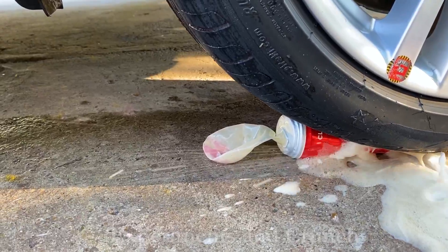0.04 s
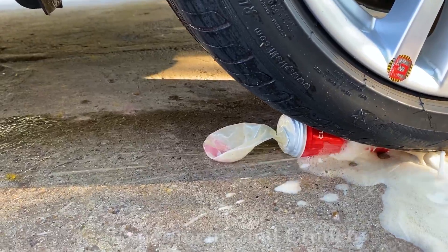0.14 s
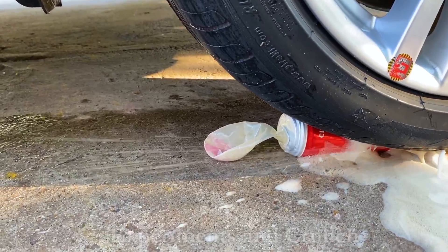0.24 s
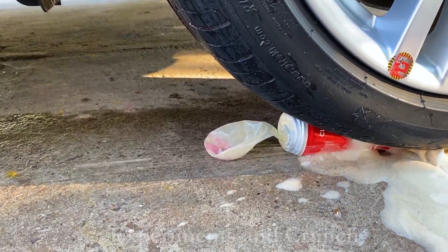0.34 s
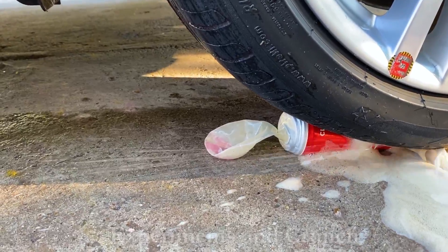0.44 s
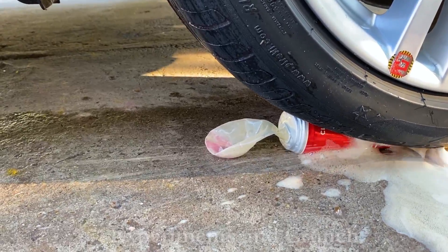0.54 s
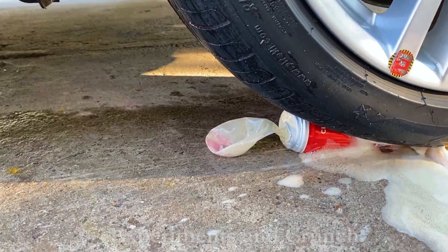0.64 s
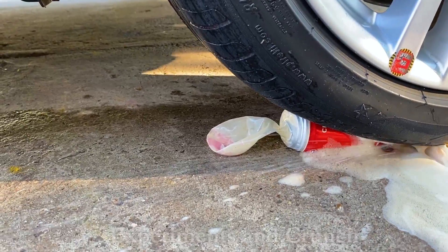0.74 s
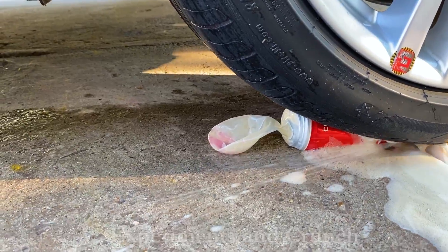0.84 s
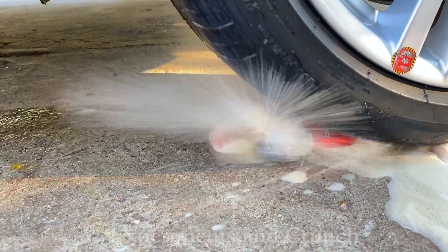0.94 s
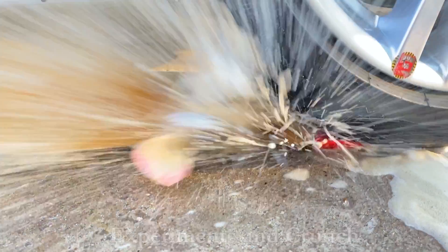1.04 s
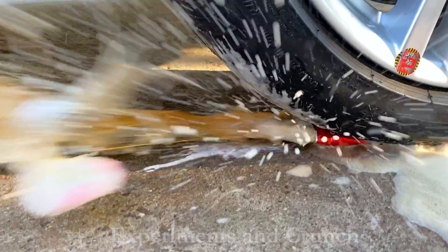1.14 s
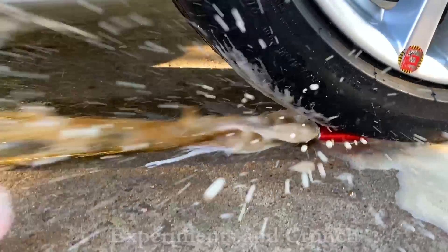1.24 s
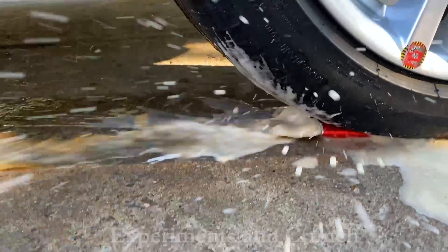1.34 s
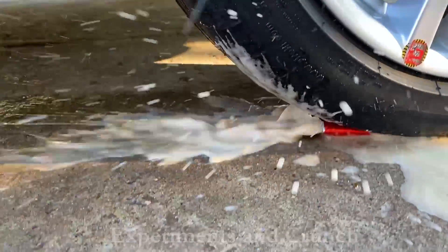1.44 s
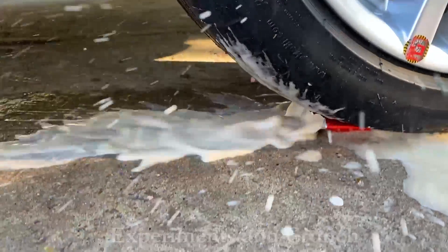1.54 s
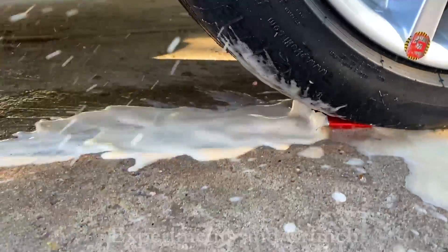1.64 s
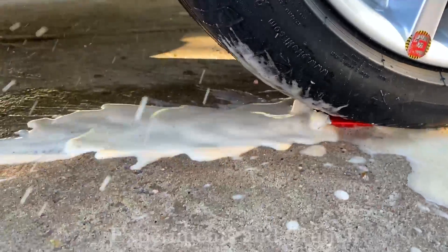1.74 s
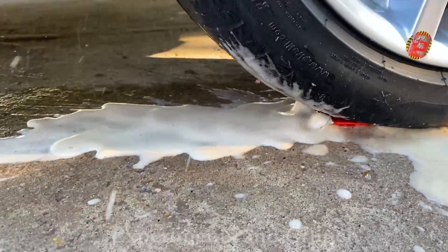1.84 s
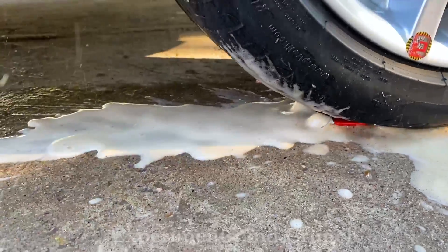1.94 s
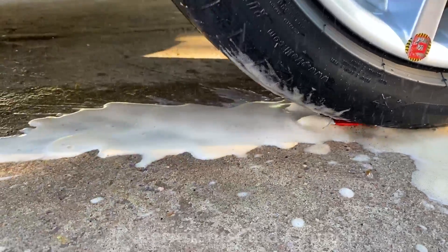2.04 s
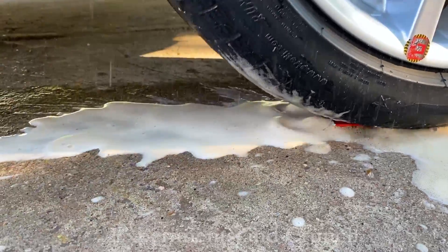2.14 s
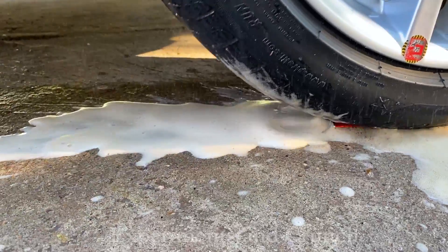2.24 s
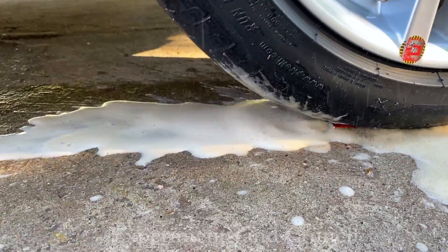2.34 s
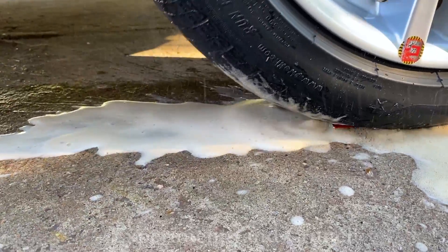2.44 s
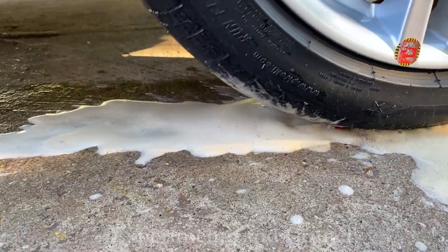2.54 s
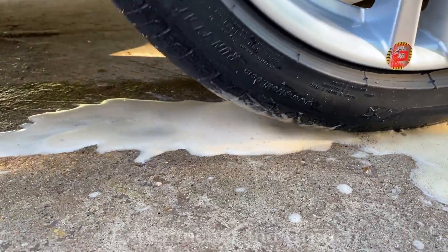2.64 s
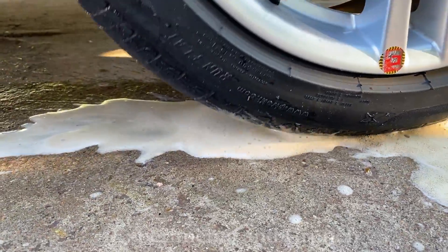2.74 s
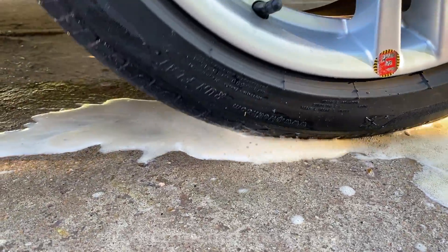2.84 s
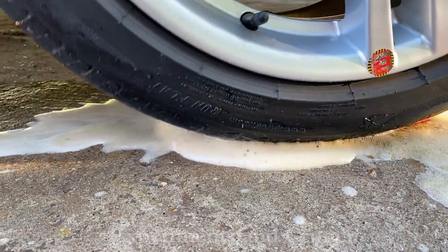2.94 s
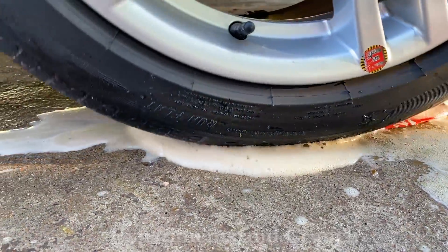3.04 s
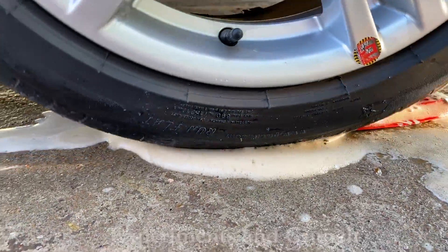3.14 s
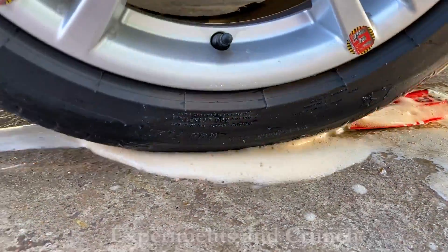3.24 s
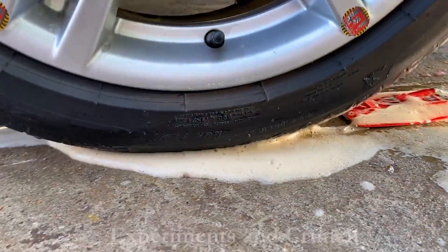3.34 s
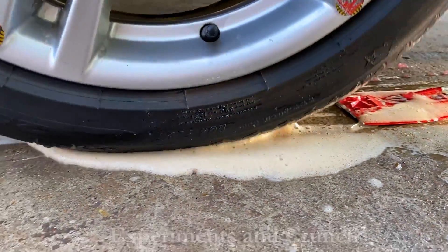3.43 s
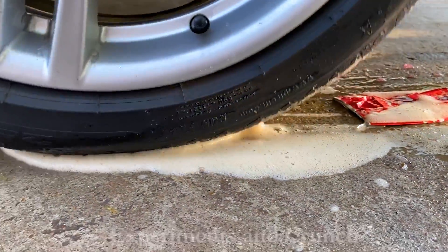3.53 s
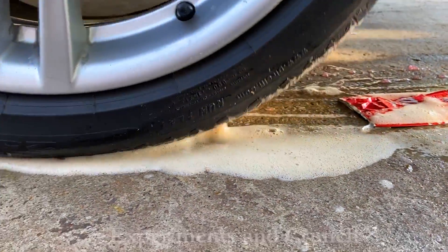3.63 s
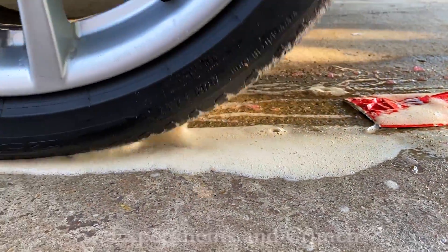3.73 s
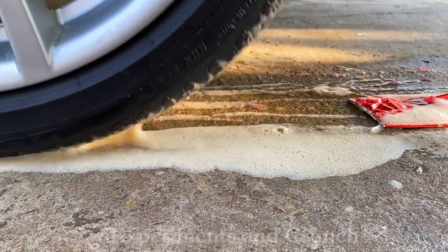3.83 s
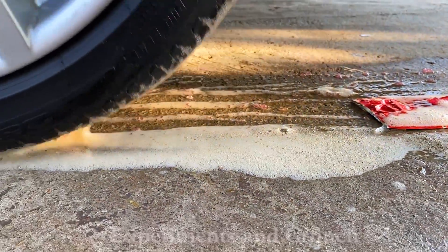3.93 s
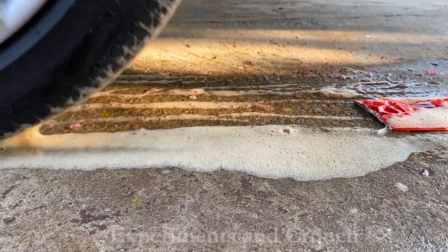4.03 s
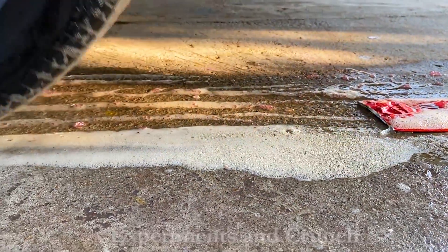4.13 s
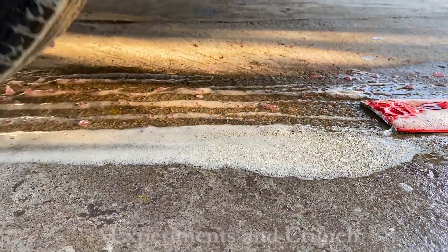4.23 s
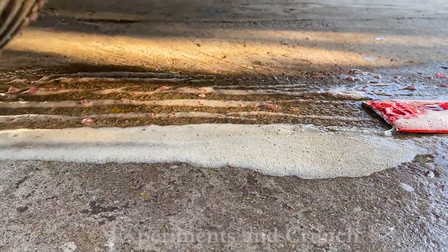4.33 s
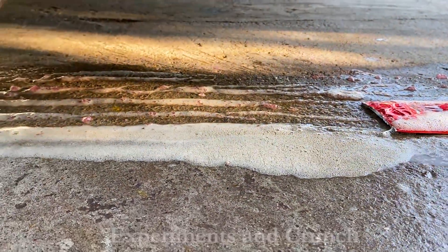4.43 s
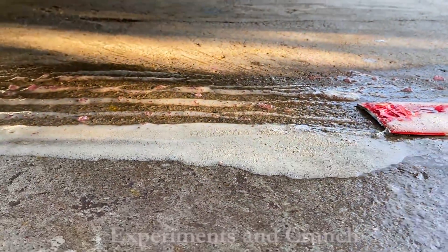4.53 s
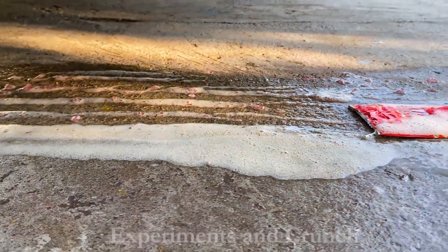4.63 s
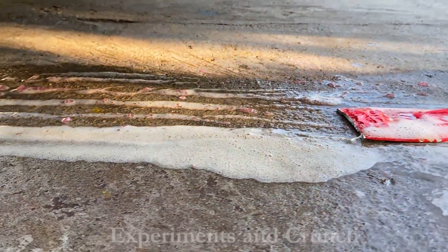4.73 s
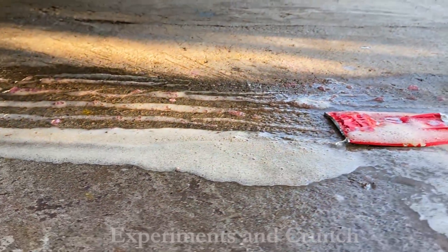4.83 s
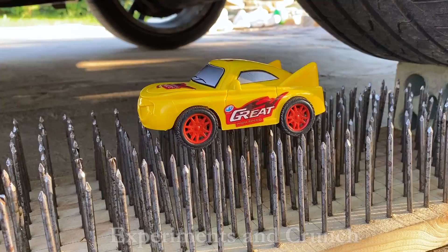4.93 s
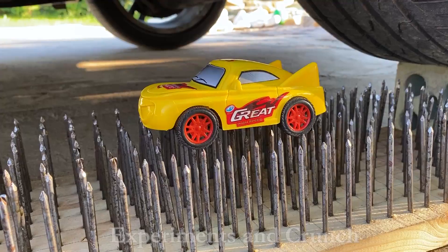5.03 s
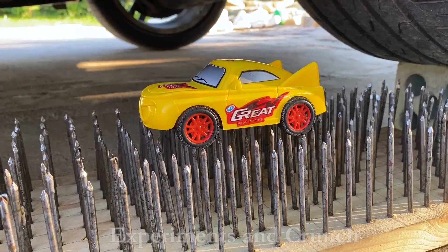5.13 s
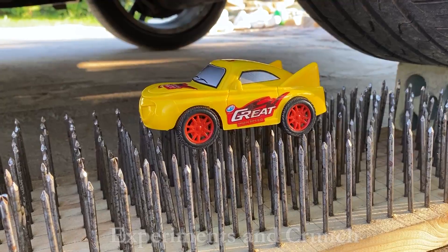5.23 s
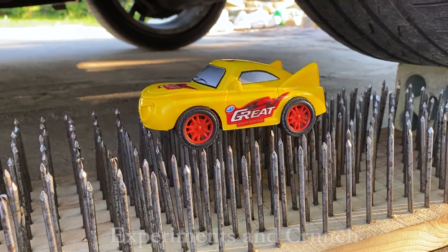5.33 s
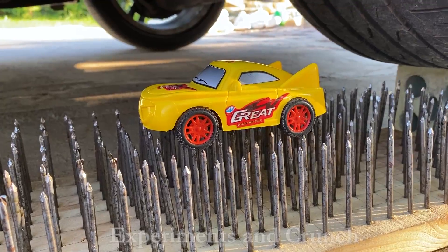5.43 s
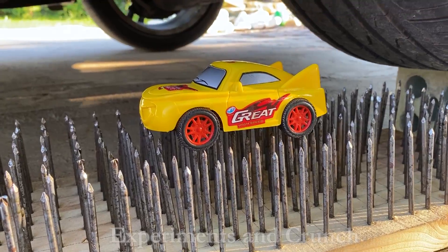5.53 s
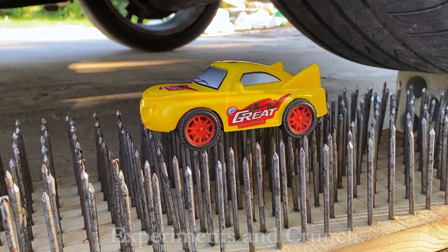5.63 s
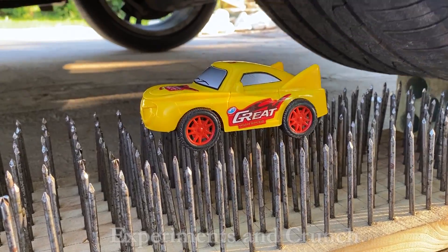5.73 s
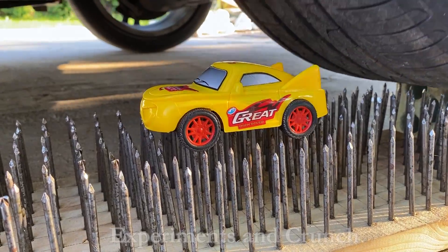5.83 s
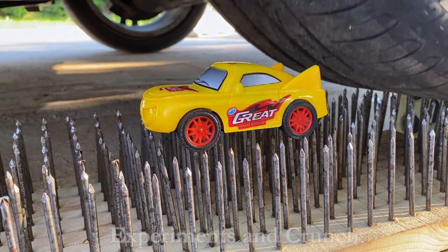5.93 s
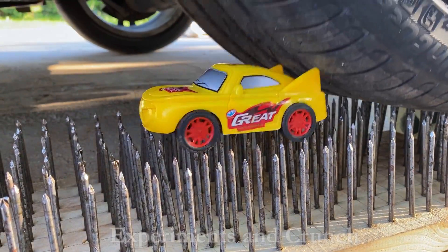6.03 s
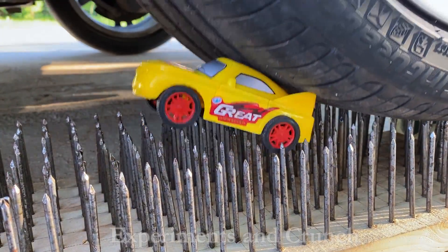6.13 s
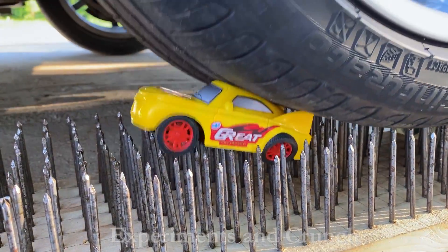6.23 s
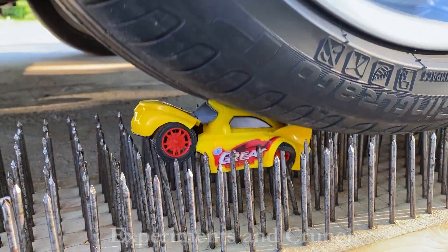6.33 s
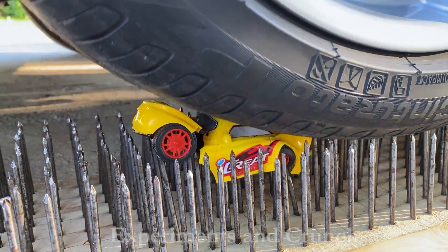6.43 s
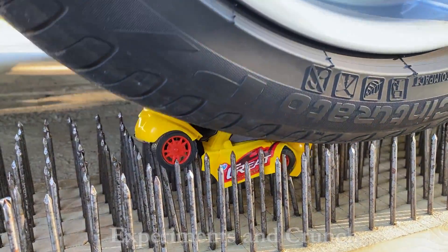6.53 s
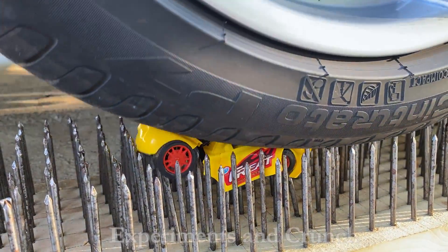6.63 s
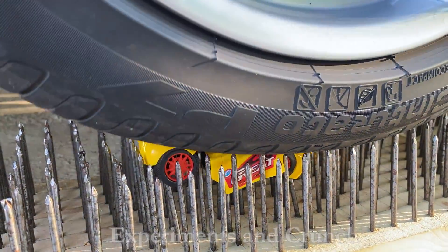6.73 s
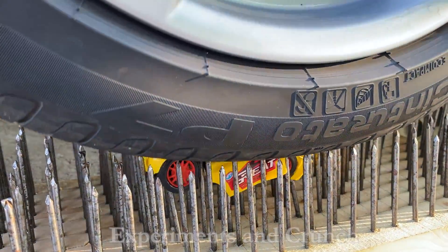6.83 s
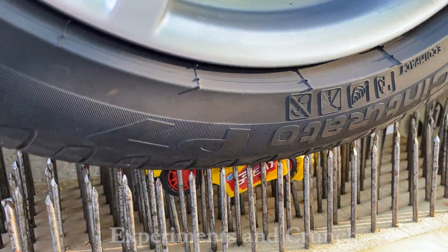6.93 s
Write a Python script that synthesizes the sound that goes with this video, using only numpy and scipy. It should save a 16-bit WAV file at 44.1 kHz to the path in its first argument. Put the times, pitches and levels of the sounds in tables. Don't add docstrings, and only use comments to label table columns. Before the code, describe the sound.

Close, dry outdoor sound beside a car tyre. From 0 to 1 s a slowed engine buzzes low and steady beneath a muffled, constant gas hiss. At about 1.0 s the can wall flutters and rasps, then bursts at 1.05 s in a loud, downward-falling thump with a short rumbling tail. The background drops sharply, then slowly returns as a dull drone, with wet foam splats around 1.85-1.95 s and heavier thuds to 2.5 s. At 2.6 s it cuts to normal speed: quiet idle, fan hum, gritty clicks and fizzing foam pops until 3.7 s, then engine alone, swelling slightly. At 5 s a louder idle with faint whine begins; a soft body jolt at 5.3 s. Plastic caves in from 6.1 to 6.35 s in dense crunches, loudest near 6.18 s, followed by scattered bright cracks. At 6.85 s remains drop with a hollow knock and brief metallic ring.

```python
import sys
import numpy as np
from scipy import signal
from scipy.fft import rfft, irfft, next_fast_len
from scipy.io import wavfile
from scipy.ndimage import uniform_filter1d, map_coordinates

SR = 44100
rng = np.random.default_rng(int(sys.argv[2]) if len(sys.argv) > 2 else 0)


def gain_from_db(level_db):
    decades = np.asarray(level_db, float) / 20
    return 10 ** decades


def generate_wav(signal):
    frames = np.transpose(np.atleast_2d(signal))
    scaled = np.clip(frames, -1, 1) * 32767
    pcm = np.round(scaled).astype(np.int16)
    wavfile.write(sys.argv[1], SR, pcm)


N = 307377

SLOW_SPEED, SLOW_END_S, TOY_START_S = 0.3, 2.596, 4.995
FAN_HZ, FAN_NEAR_HZ, FAN_NEAR_S, WHINE_HZ = 216.4, 220.5, 5.6, 992.7

# [firing_multiple, level_db]
ORDERS_SLOW = [(2, -18), (3, -16), (4, 15), (5, -3.5), (6, -16), (10, 2), (12, 4.5)]
ORDERS_ROLL = [(1, -27), (2, -8), (3, 2), (4, -1), (5, -3), (6, -9), (7, -16), (9, -13.5), (10, -20),
               (12, -12)]
ORDERS_TOY = [(1, -49.5), (2, 1), (3, 2.5), (4, 6.5), (5, 1), (6, -24), (9, -10), (10, 2), (12, -6)]
# [freq_hz, level_db_per_hz]
SPRAY = [(24, -31.5), (40, 0.5), (197, -14.5), (287, -6), (611, -9), (1250, -18.5), (1850, -20.5),
         (2240, -15.5), (2490, -20.5), (2880, -7), (3630, -21), (4290, -18.5), (4760, -30.5), (5520, -16.5),
         (6000, -45), (7800, -52), (13200, -120)]
FOAM = [(190, -43), (330, -9), (718, -5), (1780, -18), (2090, -13.5), (2500, -18.5), (3080, -13.5),
        (5510, -22), (6000, -37.5), (7800, -65), (13200, -120)]
BAY_ROLL = [(60, 8.5), (170, -5), (224, 6), (270, -8), (540, -7), (900, -16), (2050, -10.5), (2850, -14),
            (3050, -20.5), (6800, -26.5), (8400, -30.5), (10300, -24), (13200, -38), (15000, -29.5)]
BAY_TOY = [(70, -3), (147, -5.5), (239, -1), (322, -13), (836, -20.5), (1280, -24), (2220, -20),
           (2850, -24.5), (3050, -29.5), (6840, -34), (8300, -41), (10500, -35.5), (13200, -53),
           (15000, -44)]
# [freq_hz, width_hz, level_db]
SPRAY_RINGS = [(387, 17, 2), (660, 120, 6), (2290, 280, 4.5), (2845, 190, -1.5)]
INJECTOR_RING = [(6900, 270, 3.5)]
BAY_RINGS = [(543, 91, 3), (1371.3, 21, 11.5), (1800, 41.5, 6), (2135, 96, 6), (2250, 160, 5.5)]
FAN_RING = [(221.7, 12.5, 6)]
# [time_s, gain_db]
GAIN_SLOW = [
    (0, 0),
    (0.98, 0.21),
    (1, 0.5),
    (1.178, -24.5),
    (1.39, -32.5),
    (1.538, -29),
    (1.61, -28.5),
    (2.1, -16.5),
    (SLOW_END_S, -17.5),
]
GAIN_TOY = [
    (TOY_START_S, -1),
    (5.06, 0),
    (6.17, -1),
    (6.38, -4),
    (6.463, -18),
    (6.61, -9),
    (6.77, -4),
    (6.86, -5),
    (6.97, -11),
]
# [time_s, share_of_way]
TRAVEL = [
    (SLOW_END_S, 0),
    (TOY_START_S, 1),
]
# [time_s, level_db]
LURCH = [
    (5.19, -61),
    (5.24, -30.5),
    (5.31, -29),
    (5.35, -38),
    (5.4, -56),
]
# [freq_hz, width_hz, level_db]
BODY_MODES = [(65, 18, 10), (95, 15, 4), (143, 18, -17), (217, 11, -27), (482, 130, -12)]
# [time_s, pops_per_s, level_db]
TREAD = [
    (2.62, 120, -33),
    (3.0, 150, -33),
    (3.45, 120, -34),
    (3.7, 40, -37),
]
# [time_s, peak_db, centre_hz, bright_edge_db_re_peak]
GRIT = [(2.6436, -34.5, 2720, -3), (2.6657, -28, 1650, 5), (2.7332, -36, 2360, 8.5),
        (2.8208, -56, 1910, -13.5), (2.8833, -35.5, 4520, -10), (2.9007, -32, 3950, -26),
        (2.914, -50, 3980, -10), (2.9339, -41, 4750, -9), (2.9706, -54.5, 4000, 6), (3.037, -46, 2220, -20),
        (3.0455, -50, 2250, -3.5), (3.0656, -31.5, 2490, -16), (3.1553, -40, 1240, -20),
        (3.1712, -42.5, 2790, -14), (3.273, -42.5, 3750, -19), (3.286, -41, 2070, -18.5),
        (3.4045, -40.5, 1480, -22)]
# [time_s, peak_db, centre_hz, t60_s]
SPLATS = [(1.181, -49, 1254, 0.053), (1.658, -56, 615, .05), (1.8515, -28, 708, 0.014),
          (1.8522, -35, 1274, 0.0084), (1.856, -34, 1424, 0.031), (1.8652, -33.5, 1234, 0.018),
          (1.8701, -33, 1214, 0.057), (1.8855, -33.5, 1390, 0.021), (1.895, -32.5, 756, 0.031),
          (1.9114, -39, 1103, 0.11), (1.8595, -33, 1430, 0.035), (1.866, -51, 4000, .02),
          (1.878, -46, 1600, 0.029), (1.884, -49.5, 3000, .02), (1.903, -40, 4000, 0.011),
          (1.9, -43, 1400, .03)]
# [time_s, peak_db, centre_hz, t60_s]
THUDS = [(1.9464, -39, 740, 0.015), (1.9512, -37, 499.6, 0.074), (2.1181, -60, 730, 0.038),
         (2.3392, -44.5, 560, 0.045), (2.417, -24, 2000, 0.009), (2.4205, -30.5, 650, 0.0227),
         (2.5153, -41.5, 530, 0.055)]
# [time_s, flutter_hz, effort_db]
TEAR = [
    (.995, 281.6, -58.5),
    (1.012, 286.6, -27.5),
    (1.028, 291.6, -15),
    (1.04, 262, -15.5),
    (1.048, 302, -18),
    (1.0535, 323.6, -6),
    (1.055, 300, -59.5),
]
# [time_s, level_db, start_hz, end_hz, glide_s, t60_s]
BURST = (1.0547, -1, 265, 80, .0075, .018)
DROP = (6.8541, -7, 590, 240, .0042, .016)
# [freq_hz, t60_s, level_db]
BURST_TAIL = [(85.5, 0.061, -24), (155, 0.27, -26.5), (361, 0.482, -36.5), (650, 0.054, -49),
              (2000, 0.061, -47.5), (4515, .07, -61)]
# [freq_hz, level_db, t60_s]
BOARD_MODES = [(84.5, -38, 0.072), (160, -18, 0.04), (228.7, -33, 0.696), (438, -35.5, 0.42),
               (650, -33, 0.16), (850, -53, 0.7)]
# [time_s, peak_db, centre_hz, bright_edge_db_re_peak,
# t60_s]
LONE_CLICK = (6, -53, 2240, -5, -1.68)
CRUSH = [(6.107, -19.5, 1010, -23, 0.009), (6.1141, -16, 1300, -18, 0.0115), (6.13, -28, 1320, -28.5, .046),
         (6.148, -27.5, 2200, -16, 0.011), (6.153, -25, 1100, -8.5, .01), (6.1582, -16.5, 1230, -14, 0.017),
         (6.1666, -43.5, 2092, -18, 0.051), (6.1773, -4.5, 915, -28, 0.027),
         (6.1795, -10.5, 914, 1.5, 0.047), (6.183, -13.5, 2190, -13, 0.015), (6.1835, -6.5, 1640, -9, .008),
         (6.1861, -9.5, 2290, -14, 0.014), (6.189, -15, 719, -24, 0.00379),
         (6.2038, -24.5, 1622, -22, 0.0082), (6.2078, -21.5, 2270, -19, 0.012),
         (6.2131, -17.5, 1288, -23.5, 0.011), (6.2362, -21, 1100, -9, 0.015),
         (6.242, -23, 1314, -19.5, 0.025), (6.2683, -29.5, 1300, -20, .008),
         (6.2711, -12, 1260, -40, 0.012), (6.2855, -19, 1460, -6, 0.0085), (6.3027, -11, 1515, -8, 0.015),
         (6.3042, -15.5, 1800, -10, 0.017), (6.3091, -14, 2800, -24, 0.016), (6.3137, -15, 2860, -3, 0.008),
         (6.3162, -9, 2646, -16.5, 0.011), (6.3314, -16, 2790, 7.5, 0.028),
         (6.3337, -11, 2214, -25, 0.0058)]
# [time_s, peak_db, centre_hz, bright_edge_db_re_peak]
CRACKS = [(6.3669, -32.5, 5000, 0.5), (6.3748, -38, 3000, 6), (6.381, -12, 3280, -2),
          (6.3862, -11.5, 1680, -2), (6.3883, -22.5, 1300, -4.5), (6.405, -44, 5000, 8),
          (6.4137, -18.5, 2880, -1), (6.4473, -28, 3086, 5.5), (6.4732, -26, 4550, -1.5),
          (6.491, -30, 5130, 2.5), (6.508, -46, 5000, 11), (6.519, -45, 5000, -1), (6.564, -43, 5000, 2),
          (6.632, -52.5, 5000, 2), (6.5372, -15, 2900, 0), (6.5773, -28, 2500, 3), (6.603, -33, 1190, -8),
          (6.607, -26, 2070, -12), (6.6603, -20, 3700, 6), (6.802, -31.5, 3570, 10.5),
          (6.847, -21, 4750, -13), (6.8537, -14.5, 1550, 8), (6.926, -35, 3600, 2),
          (6.937, -29, 3970, -8.5)]
# [time_s, length_s, level_db]
SURGES = [
    (6.108, 0.0255, -33),
    (6.148, 0.067, -31.5),
    (6.197, 0.0085, -42),
    (6.272, 0.13, -42.5),
    (6.402, 0.045, -49),
]
# [freq_hz, width_hz]
GRIND_MODES = [(930, 100), (1150, 140), (1380, 74), (1630, 120), (2210, 270)]
SNAP_MODES = [(600, 110), (945, 100), (1330, 67), (1650, 140), (1950, 200), (2290, 100), (2800, 370),
              (3300, 190)]
# [freq_hz, width_hz, level_db]
PORT_RINGS = [(4800, 1500, -1), (6600, 1500, 1), (10200, 1700, 2), (14000, 1500, -9)]
# [low_hz, high_hz]
HOLES_HZ = [(11700, 12550), (15450, 16350), (19450, 52000)]


def rms_one(x):
    return x / np.sqrt(np.mean(x ** 2) + 1e-20)


def in_time(rows):
    s, *columns = np.transpose(rows)
    t = np.arange(N) / SR
    gate = uniform_filter1d(1. * ((t >= s[0]) & (t <= s[-1])), size=100)
    return [gate] + [np.interp(t, s, c) for c in columns]


def follow(control, *layers, after_s=-1):
    return [(s, *[rest + slope * v for rest, slope in layers]) for s, v in control if s > after_s]


def drift(rate):
    knots = rng.standard_normal(430)
    coarse = map_coordinates(knots, [np.arange(N // 64 + 2) * 64 / SR * min(rate, 59)], order=3)
    return np.interp(np.arange(N) / 64, np.arange(len(coarse)), rms_one(coarse))


def glide(hz):
    return 2 * np.pi * np.cumsum(hz) / SR


def band(x, low_hz, high_hz):
    return signal.sosfilt(signal.butter(2, [low_hz, min(high_hz, 20000)], "band", fs=SR, output="sos"), x)


def noise_band(low_hz, high_hz):
    return rms_one(band(rng.standard_normal(N), low_hz, high_hz))


def resonance(x, hz, width_hz):
    r = np.exp(-np.pi * width_hz / SR)
    return signal.lfilter([(1 - r * r) / 2, 0, (r * r - 1) / 2], [1, -2 * r * np.cos(2 * np.pi * hz / SR), r * r], x)


def coloured(spectrum, low_hz, high_hz, rings=()):
    size = next_fast_len(N)
    hz, points = np.fft.rfftfreq(size, 1 / SR) + 1, np.array(spectrum)
    level_db = np.interp(np.log(hz), np.log(points[:, 0]), points[:, 1])
    for ring_hz, width_hz, ring_db in rings:
        level_db += ring_db / (1 + (2 * (hz - ring_hz) / width_hz) ** 2)
    bins = rfft(rng.standard_normal(size)) * gain_from_db(level_db)
    inside = irfft(bins * ((hz > low_hz) & (hz < high_hz)), size)
    return irfft(bins, size)[:N] / inside.std()


def firing_phase():
    idle_hz, loaded_hz = 23.36, 23.94
    t = np.arange(N) / SR
    rate_hz = np.where(t < TOY_START_S, idle_hz, loaded_hz) * np.where(t < SLOW_END_S, SLOW_SPEED, 1)
    return glide(rate_hz * (1 + 0.00425 * drift(5.9)))


def exhaust(phase, orders, wobble_db):
    out = np.zeros(N)
    for k, db in orders:
        level = gain_from_db(db + wobble_db * min(k / 4, 1) * drift(17))
        out += level * np.cos(k * phase - 0.58 * k + 0.14 * k * drift(14))
    return rms_one(out)


def engine(rows, orders, noise, throb_db, wobble_db):
    flicker_db = 0.6
    gate, exhaust_db, hiss_db = in_time(rows)
    phase = firing_phase()
    hiss = noise * gain_from_db(hiss_db + throb_db * np.cos(phase) + flicker_db * drift(24))
    return gate * (gain_from_db(exhaust_db) * exhaust(phase, orders, wobble_db) + hiss)


def hum(hz, rows, wobble_db, wander):
    gate, db = in_time(rows)
    phase = glide(hz * (1 + wander * drift(11)))
    return gate * np.sqrt(2) * gain_from_db(db + wobble_db * drift(8.5)) * np.sin(phase)


def slowed_bed():
    exhaust_level, leak_level = (-43.5, 0.527), (-37.5, 1.265)
    fan_level, drone_level = (-33.5, 0.767), (-51.5, 0.41)
    burst_done = np.arange(N) > BURST[0] * SR
    leak = np.where(burst_done, coloured(FOAM, 250, 4400), coloured(SPRAY, 330, 3400, SPRAY_RINGS))
    out = engine(follow(GAIN_SLOW, exhaust_level, leak_level), ORDERS_SLOW, leak, throb_db=0.12, wobble_db=2.5)
    gate, drone_db = in_time(follow(GAIN_SLOW, drone_level, after_s=BURST[0]))
    out += gate * gain_from_db(drone_db) * rms_one(band(band(rng.standard_normal(N), 130, 283.6), 70, 330))
    return out + hum(FAN_HZ * SLOW_SPEED, follow(GAIN_SLOW, fan_level, after_s=BURST[0]), 1.0, 0.011)


def rolling_bed():
    exhaust_level, hiss_level = (-51.5, 6.8), (-58, -4)
    fan_level, whine_level = (-60.5, -19), (-75.5, -2.1)
    bay = coloured(BAY_ROLL, 530, 2700, INJECTOR_RING)
    out = engine(follow(TRAVEL, exhaust_level, hiss_level), ORDERS_ROLL, bay, throb_db=1.0, wobble_db=3.78)
    out += hum(FAN_HZ, follow(TRAVEL, fan_level), 1.5, 0.0047)
    return out + hum(WHINE_HZ, follow(TRAVEL, whine_level), 3.2, 0.00238)


def toy_bed():
    exhaust_level, hiss_level = (-35.5, 1.05), (-44, 1)
    fan_level, whine_level = (-49, 0.15), (-58, 2.2)
    bay = coloured(BAY_TOY, 280.0, 3340, BAY_RINGS + FAN_RING)
    out = engine(follow(GAIN_TOY, exhaust_level, hiss_level), ORDERS_TOY, bay, throb_db=1.0, wobble_db=4.0)
    out += hum(FAN_NEAR_HZ, follow(GAIN_TOY, fan_level, after_s=FAN_NEAR_S), 0.56, 0.0023)
    return out + hum(WHINE_HZ, follow(GAIN_TOY, whine_level), 3.2, 0.0019)


def ducking(hits, depth, release_db_s):
    over_db = np.maximum(20 * np.log10(uniform_filter1d(np.abs(hits), size=300) + 1e-9) + 34, 0)
    ramp = release_db_s * np.arange(N) / SR
    return gain_from_db(-depth * (np.maximum.accumulate(over_db + ramp) - ramp))


def lurch():
    gate, db = in_time(LURCH)
    shake = band(rng.standard_normal(N), 37.0, 610)
    modes = sum(gain_from_db(d) * rms_one(resonance(shake, hz, width_hz)) for hz, width_hz, d in BODY_MODES)
    return gate * gain_from_db(db) * rms_one(modes)


def wet_tread():
    gate, per_s, db = in_time(TREAD)
    popping = rng.random(N) < per_s * gain_from_db(5 * drift(14)) / SR
    pops = popping * rng.standard_normal(N) * gate
    pitches_hz, dealt = np.geomspace(1800, 5200, 8), rng.integers(0, 8, N)
    rings = sum(resonance(pops * (dealt == k) + 1e-18, hz, hz / 9) for k, hz in enumerate(pitches_hz))
    return gain_from_db(db) * rings


def pulse(s, db, start_hz, end_hz, glide_s, t60_s):
    t = np.maximum(np.arange(N) / SR - s, 0)
    hz = (t > 0) * (end_hz + (start_hz - end_hz) * np.exp(-(t / glide_s) ** 2))
    return gain_from_db(db - 60 * (t / t60_s) ** 2) * np.sin(glide(hz))


def board():
    t = np.maximum(np.arange(N) / SR - DROP[0], 0)
    out = pulse(*DROP) + (t > 0) * gain_from_db(-27 - 60 * t / 0.068) * noise_band(120, 1600)
    for hz, db, t60_s in BOARD_MODES:
        out += gain_from_db(db - 60 * t / t60_s + 2.9 * drift(40)) * np.sin(2 * np.pi * hz * t)
    return out


def snaps(rows, low_hz, high_hz, top_hz, grain_db, cycles, tail_db, lead, knock_db, shell=(), rings=(),
          thump_db=-60):
    rise_s, tail_t60_s = 0.0004, 0.067
    shell_share, shell_reach_oct = 0.45, 0.8
    edge_t60_s, edge_linger_db, edge_flat_share = 0.014, -10, 0.25
    size = 8000
    out = np.zeros(N + size)
    t = np.arange(size) / SR
    draws = rng.random((len(rows), 3, size)) * (1 - 1e-9) + 1e-10
    white = np.sqrt(-2 * np.log(draws[:, 0])) * np.cos(2 * np.pi * draws[:, 1])
    for (s, db, hz, edge_db, t60_s), noise, big in zip(rows, white, -np.log(draws[:, 2])):
        fall = gain_from_db(-60 * (t / max(t60_s, .004)) ** 1.39) + gain_from_db(tail_db - 60 * t / tail_t60_s)
        slips = noise * gain_from_db(grain_db * np.minimum(big, 4)) * fall * np.minimum(t / rise_s, 1)
        slips = slips + lead * (t == 0)
        mid = resonance(resonance(slips, hz, hz / cycles), hz, hz * 0.34)
        mid = mid + 0.71 * band(slips, hz / 1.73, hz * 2.01)
        for k, (mode_hz, width_hz) in enumerate(shell):
            near = shell_share * np.exp(-(np.log2(mode_hz / hz) / shell_reach_oct) ** 2)
            mid = mid + (-1) ** k * near * np.sqrt(hz / width_hz) * resonance(slips, mode_hz, width_hz)
        quick = slips * (gain_from_db(-60 * t / edge_t60_s) + gain_from_db(edge_linger_db))
        edge = edge_flat_share * band(quick, high_hz, top_hz)
        for ring_hz, width_hz, ring_db in rings:
            ring = resonance(resonance(quick, ring_hz, width_hz), ring_hz, 2 * width_hz)
            edge = edge + gain_from_db(ring_db) * ring
        knock = band(resonance(slips, low_hz, low_hz * 2.44), low_hz / 3, low_hz * 2.32)
        thump = band(np.abs(slips), 58, 224)
        body_db = knock_db - 3.6 * np.log2(hz / 2000)
        parts = ((0, mid), (edge_db, edge), (body_db, knock), (thump_db, thump))
        at = round(s * SR) - 5
        out[at:at + size] += sum(gain_from_db(db + d) * v / np.abs(v).max() for d, v in parts)
    return out[:N]


def grit():
    rows = [(*row, 0.0051) for row in GRIT]
    return snaps(rows, 600, 5600, 10300, rings=PORT_RINGS[1:3], grain_db=3.5, cycles=3.4, tail_db=-8.5,
                 lead=7.6, knock_db=-10.5)


def wet_hits():
    edge_db = -43
    wet = dict(low_hz=164, high_hz=3400, top_hz=5800, grain_db=3.5, cycles=2.6, tail_db=-10.5, lead=37)
    splats, thuds = [[(s, db, hz, edge_db, t60_s) for s, db, hz, t60_s in rows] for rows in (SPLATS, THUDS)]
    return snaps(splats, knock_db=-28, **wet) + snaps(thuds, knock_db=-8, **wet)


def burst():
    wall_hz, wall_db, sag_start_s, sag_hz_per_s = 830, -7, 1.035, 6500
    gate, flutter_hz, effort_db = in_time(TEAR)
    t = np.arange(N) / SR
    turns = glide(flutter_hz * (1 + .08 * drift(59)))
    sagging_hz = wall_hz - sag_hz_per_s * np.clip(t - sag_start_s, 0, .03)
    flutter = np.sin(turns) + 0.3 * np.sin(1.3 * turns)
    flutter += gain_from_db(wall_db) * np.sin(glide(sagging_hz * (1 + 0.018 * drift(59))))
    flutter += 0.27 * noise_band(40, 700)
    white = rng.standard_normal((2, N))
    rasp = sum(resonance(resonance(v, hz, 200), hz, 300) for v, hz in zip(white, (1800, 2280)))
    rasp = rms_one(band(rasp, 1500, 2600))
    out = gate * (gain_from_db(effort_db) * flutter + gain_from_db(-21.5 + 0.53 * effort_db) * rasp) - pulse(*BURST)
    after = np.maximum(t - BURST[0] + 0.0011, 0)
    out += (after > 0) * gain_from_db(-17.5 - 60 * (after / 0.011) ** 2) * rms_one(band(white[0], 1100, 3800))
    for hz, t60_s, db in BURST_TAIL:
        out += (after > 0) * gain_from_db(db - 60 * after / t60_s) * noise_band(hz / 2.6, hz * 1.1)
    return out


def crunch():
    attack_s, release_db_s, edge_db = 0.0014, 900, -21
    rub_start_s, rub_rise_s, rub_db = 6.5, 0.28, -66
    t = np.arange(N) / SR
    surge = np.zeros(N)
    for s, length_s, db in SURGES:
        release_db = release_db_s * np.maximum(t - s - length_s, 0)
        surge += np.clip((t - s) / attack_s, 0, 1) * gain_from_db(db - release_db)
    slips = rng.standard_normal(N) * gain_from_db(4 * np.minimum(rng.exponential(1, N), 4) + 1.5 * drift(59))
    shell = sum(rms_one(resonance(slips, hz, width_hz)) for hz, width_hz in GRIND_MODES)
    rub = np.clip((t - rub_start_s) / rub_rise_s, 0, 1) * gain_from_db(rub_db) * noise_band(3000, 15000)
    return rub + surge * (rms_one(shell) + gain_from_db(edge_db) * rms_one(band(slips, 3100, 17000)))


def toy_breaks():
    plastic = dict(low_hz=338, high_hz=4230, top_hz=14400, thump_db=-18.5, shell=SNAP_MODES, rings=PORT_RINGS,
                   grain_db=7.0, lead=45.0)
    cave_in = snaps([LONE_CLICK] + CRUSH, knock_db=-9.5, cycles=3.5, tail_db=-18.0, **plastic)
    cracks = [(*row, 0.011) for row in CRACKS]
    return cave_in + snaps(cracks, knock_db=-5.5, cycles=5.0, tail_db=-9.5, **plastic)


def scene():
    beds = slowed_bed() + rolling_bed() + toy_bed()
    breaks = toy_breaks()
    out = beds * ducking(breaks, depth=0.044, release_db_s=150)
    out += lurch() + wet_tread() + grit() + wet_hits()
    out += burst() + board() + crunch() + breaks
    return out[None]


def top_cut(x):
    return signal.sosfilt(signal.butter(12, 16520, fs=SR, output="sos"), x)


def record(dry):
    dip_hz, dip_width_hz, dip_db = 8190, 100, -17
    x = .62 * np.tanh(dry[0] / .62)
    size = next_fast_len(N)
    hz, bins = np.fft.rfftfreq(size, 1 / SR), rfft(x, size)
    treble_db = 20 * np.log10(uniform_filter1d(np.abs(band(x, 1500, 16000)), size=700) + 1e-9)
    loud = np.clip((treble_db + 42) / 18, 0, 1)
    takes = []
    for speed, holes in ((SLOW_SPEED, HOLES_HZ), (1, HOLES_HZ[:2])):
        heard = bins * gain_from_db(dip_db / (1 + (2 * (hz / speed - dip_hz) / dip_width_hz) ** 2))
        gaps = sum(np.clip(np.minimum(hz - a * speed, b * speed - hz) / 200 + .5, 0, 1) for a, b in holes)
        steady = irfft(heard * (1 - gaps), size)[:N]
        filled = irfft(heard * gaps * (hz < 19600 * speed), size)[:N]
        takes.append(steady + loud * filled)
    out = np.where(np.arange(N) < SLOW_END_S * SR, *takes)
    out = signal.sosfilt(signal.butter(2, 16, "high", fs=SR, output="sos"), out)
    out = signal.sosfilt(signal.cheby2(12, 70, 16900, fs=SR, output="sos"), out)
    return top_cut(out[None])


dry = scene()
out = record(dry)
generate_wav(out)
```